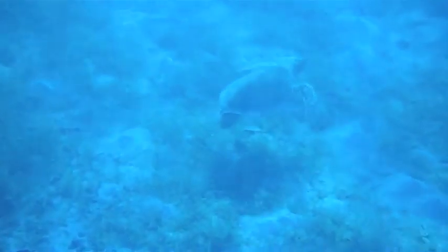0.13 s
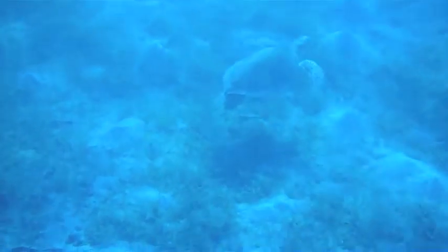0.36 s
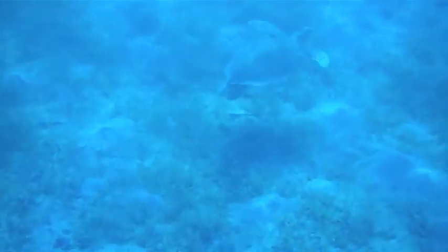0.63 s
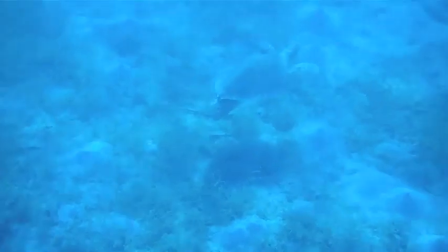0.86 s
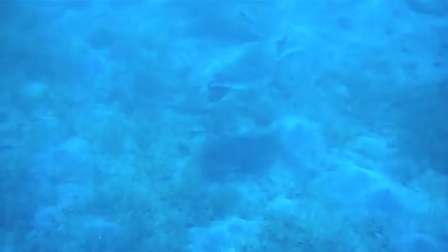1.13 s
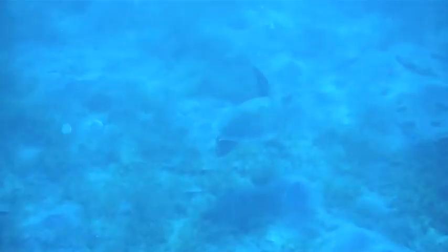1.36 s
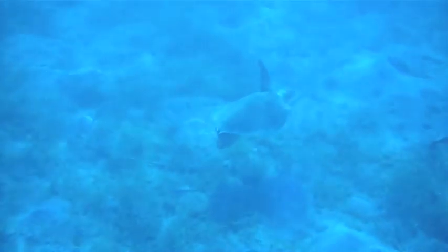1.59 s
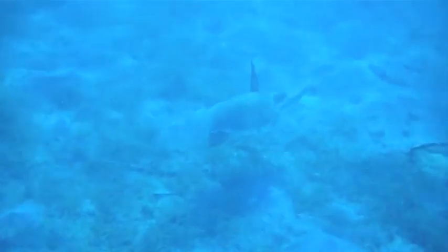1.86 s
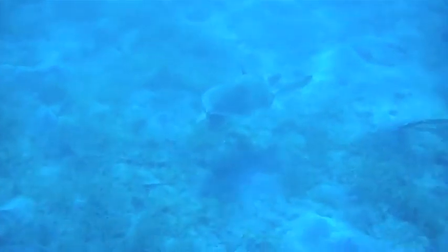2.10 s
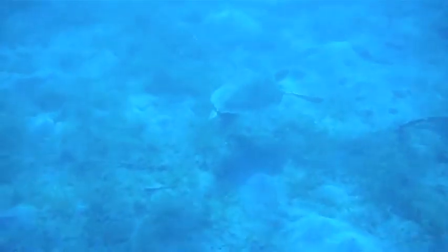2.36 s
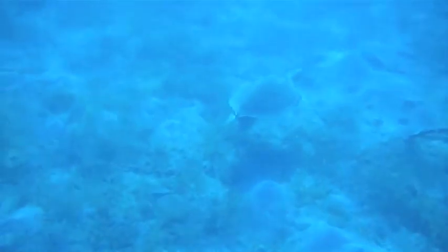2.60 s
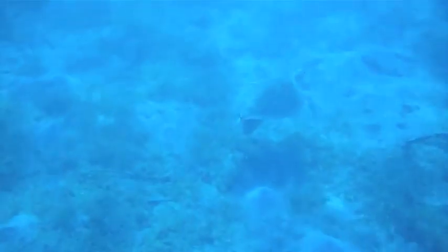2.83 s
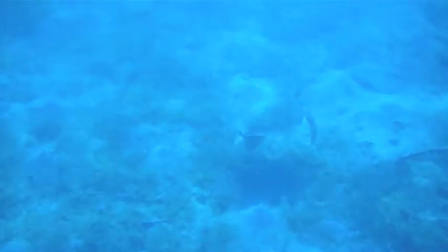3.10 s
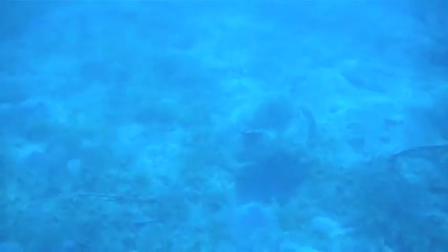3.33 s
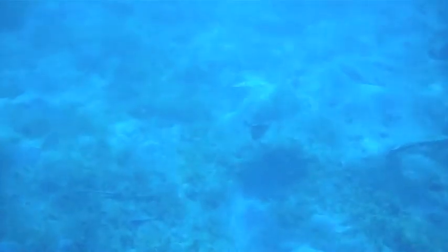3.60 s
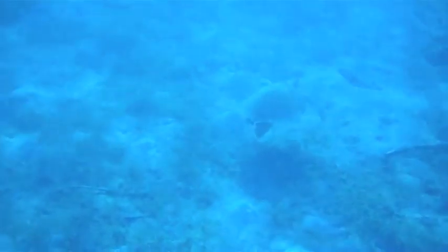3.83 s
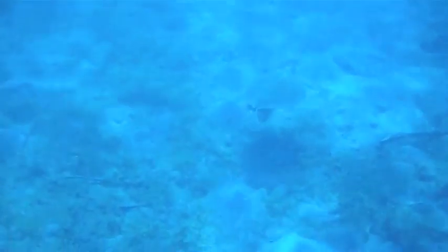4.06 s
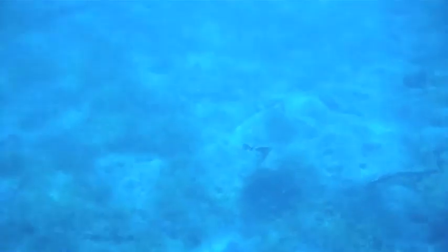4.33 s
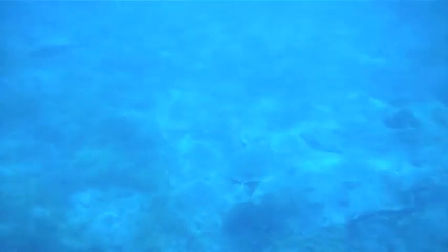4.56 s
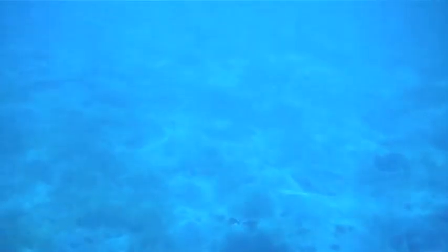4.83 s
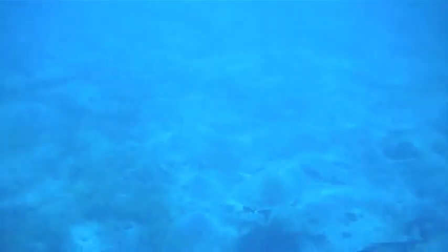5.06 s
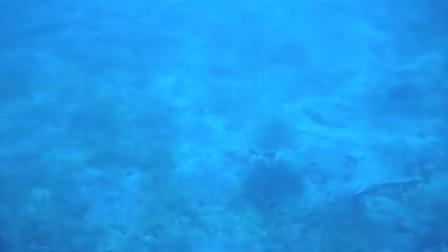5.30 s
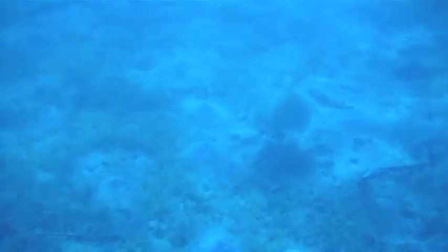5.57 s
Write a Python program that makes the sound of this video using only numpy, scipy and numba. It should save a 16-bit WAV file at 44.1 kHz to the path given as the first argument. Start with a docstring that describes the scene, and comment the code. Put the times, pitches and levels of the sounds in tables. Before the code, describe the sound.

Underwater above a reef where a turtle swims silently, a camera in a hard housing picks up constant fine shrimp crackle, hiss, a faint whine and low water rumble. Hands tap and knock the case, lightly at first, then with sharper clacks; two very loud blows near four seconds overload the microphones. Later a cluster of rubbing and taps follows.

```python
"""Sharp cracks and shrimp crackle sound all round while hands knock, rub and scrape a camera's hard housing
over a reef. Blows, cracks and rubbing are damped modes of the housing, struck or driven by noise; the scrape
is noise in a wall. Below them lie filtered-noise water rumble, soft low thumps, a thin electronic whine,
hiss and a low hum. The hardest blows overload the input, and the gain control ducks after them."""
import sys
import numpy as np
from scipy import signal
from scipy.fft import rfft, irfft
from scipy.io import wavfile
from scipy.ndimage import uniform_filter1d
from numba import njit

SR = 44100
rng = np.random.default_rng(int(sys.argv[2]) if len(sys.argv) > 2 else 0)


def transcribe(signal):
    """Save signal, clipped to [-1, 1], as a 16-bit WAV file at the path in sys.argv[1]."""
    frames = np.atleast_2d(signal).T
    limited = np.clip(frames, -1, 1)
    pcm = np.round(limited * 32767).astype(np.int16)
    wavfile.write(sys.argv[1], SR, pcm)


def makeup_ratio(level_db):
    """Linear amplitude ratio for a level in decibels (20 dB per factor of ten)."""
    decades = np.asarray(level_db, float) / 20
    return 10 ** decades


N = 272538

# big panels sound below the first limit, small panels up to the second, the highest modes above it
BIG_PANEL_TOP_HZ, SMALL_PANEL_TOP_HZ = 600, 2500


def level(x, db):
    """Scale to an rms level."""
    return x * makeup_ratio(db) / np.sqrt(np.mean(x ** 2))


def curves(table):
    """Interpolate the columns of a (time [s], value, ..) table at every sample."""
    times, *columns = np.transpose(table)
    return [np.interp(np.arange(N) / SR, times, column) for column in columns]


def strays(db, hz, spread_db, spread, busy, count):
    """Rows (time [s], level [dB], pitch [Hz]) at random moments, denser where busy is high."""
    share = np.cumsum(busy)
    size, bend = rng.standard_normal((count, 2)).T
    times = np.searchsorted(share, rng.random(count) * share[-1]) / SR
    return list(zip(times, db + spread_db * size, hz * np.exp(spread * bend)))


def ears(vibration, pan_db, lead):
    """A complex vibration as the left and right microphones hear it, apart in level and phase."""
    side = np.array([1., -1.]).reshape(2, *[1] * np.ndim(vibration))
    return np.imag(vibration * makeup_ratio(side * pan_db / 2) * np.exp(-.5j * side * lead))


# ringing modes of the housing: (frequency [Hz], t60 [s], level under steady sound [dB],
# level under a blow [dB], left minus right [dB], right leads by [rad])
HOUSING_MODES = [(101.9, 0.059, -13, 13.5, -8, 7.5), (199, 0.13, -24, -14.5, 0.5, 1),
                 (248, 0.081, -16, -4.5, -1, -1.5), (308.5, 0.054, -2, 2, -2.5, -0.3),
                 (355.6, 0.048, -4, -8.5, -4, 0.5), (540, 0.016, -30.5, -17, 18.5, 1.5),
                 (879.4, 0.019, -7, 1, 2, 1.05), (1080, 0.018, -13.5, -9.5, -4.5, -0.34),
                 (1150, 0.0091, -17.5, -4.5, 1.5, -0.8), (1236, 0.02, -9, -3, -3, 0.5),
                 (1496, 0.015, -18.5, -6.5, -3, 1.08), (1934, 0.12, 5.5, -33, -3, 0.79),
                 (2048, 0.014, -5.5, 4.5, -4, 0.4), (2827, 0.01, 2.5, 10.5, -8, -2),
                 (3465, 0.0077, -35, -2, -11.5, -1.5), (3817, 0.012, -36, -2.5, 21, 0.3),
                 (4370, 0.14, -35.5, -42.5, -12, -0.5), (4548, 0.012, 5.5, 1, -2.5, -2.5),
                 (5403, 0.0092, -7.5, 3, -8, 4), (6115, 0.01, 5.5, -5, 1.5, -1.5),
                 (6410, 0.012, 0.5, -1.5, -25.5, 2.5), (7460, 0.0054, -34, -1.5, 37.5, -0.3),
                 (8820, 0.012, -45, 0, 18.5, 2), (10300, 0.0018, -22.5, 10, 23.5, 0.45),
                 (12900, 0.0028, -44, -1, 19, 5)]


def part(low_hz, high_hz):
    """The housing modes between two frequencies."""
    return [mode for mode in HOUSING_MODES if low_hz <= mode[0] < high_hz]


def ring(rows, modes, rise_s, reach, steep, scatter, scatter_db, detune, lean=0):
    """Each (time [s], peak [dB], pitch [Hz], pan [dB]) blow rings the modes near its pitch as they die away."""
    length = 4096
    out, t = np.zeros((2, N + length)), np.arange(length) / SR
    hz, t60, _, blow_db, pan_db, lead = np.transpose(modes)[:, :, None]
    decay = np.exp(-np.log(1000) / t60 * t)
    fade = decay * (1 - np.exp(-t / rise_s)) ** 2
    # each mode's phase, level and pitch vary a little at random from blow to blow
    chance = rng.standard_normal((len(rows), 3, len(modes), 1))
    for (s, db, centre_hz, side_db), (turn, size, bend) in zip(rows, chance):
        distance = np.log(hz / centre_hz) / reach
        weight = makeup_ratio(blow_db + scatter_db * size) / (1 + distance ** 2) ** steep
        # a positive lean favours the modes below the pitch, as a soft fingertip does
        weight = weight * (centre_hz / hz) ** lean
        bent_hz = hz * (1 + detune * bend)
        swing = fade * np.exp(1j * (2 * np.pi * bent_hz * t + scatter * turn))
        wave = ears(swing * weight, pan_db, lead).sum(axis=1)
        wave = wave * makeup_ratio(np.array([[side_db], [-side_db]]) / 2)
        mean_peak = np.abs(wave).max(axis=1).mean()
        start = int(s * SR)
        out[:, start:start + length] += wave * makeup_ratio(db) / mean_peak
    return out[:, :N]


def through(x, modes):
    """A steady push heard through resonant modes, each a one-pole complex resonator."""
    out = 0
    for hz, t60, steady_db, _, pan_db, lead in modes:
        pole = np.exp((2j * np.pi * hz - np.log(1000) / t60) / SR)
        vibration = signal.lfilter([1 - abs(pole)], [1, -pole], x)
        out = out + ears(vibration * makeup_ratio(steady_db), pan_db, lead)
    # little of the lowest bass comes through the ringing modes
    return signal.sosfilt(signal.butter(2, 140.0, "highpass", fs=SR, output="sos"), out)


# faint finger taps: typical thud and knock
TAP_THUD_DB, TAP_THUD_HZ, TAP_KNOCK_DB, TAP_KNOCK_HZ = -43, 316, -41, 1400
# hands against the case: (time [s], thud peak [dB], thud pitch [Hz], knock peak [dB], knock pitch [Hz])
HAND_KNOCKS = [(0.131, -41, 343, -44.5, 890), (0.3274, -40.5, 363, -19, 1150),
               (0.6068, -37, 362, -28, 1140), (0.8006, -36, 316, -27, 1050), (0.859, -37, 341, -18.5, 1150),
               (0.9194, -35, 328, -38, 1010), (0.9308, -32.5, 298, -29, 1110),
               (0.9609, -20, 240, -22, 1320), (1.0431, -22.5, 243, -21, 1280),
               (1.069, -45, 306, -36.5, 960), (1.1574, -30, 347, -19.5, 920),
               (1.1998, -63, 267, -33.5, 2030), (1.239, -60.5, 320, -35.5, 1030),
               (1.2734, -40.5, 307, -31.5, 1040), (1.3806, -29, 346, -30.5, 1110),
               (1.6545, -41.5, 314, -34, 1910), (1.7054, -38, 360, -42.5, 1040),
               (1.8763, -58, 312, -32, 1960), (2.137, -20, 269.4, -27.5, 1150),
               (2.409, -14.5, 323, -13, 1210), (2.5392, -24, 307, -16, 1640),
               (2.6361, -41, 257, -38.5, 2020), (2.9527, -22.5, 279, -14.5, 1640),
               (3.0082, -51, 275, -26, 1860), (3.05, -30.5, 250, -35.5, 1250), (3.683, -23, 269, -45, 1100),
               (3.7557, -16.5, 270, -15.5, 1550), (3.9167, 3, 248, -4.5, 1636),
               (4.0307, -33.5, 269, -64, 1690), (4.2793, -23.5, 268, -30, 1150), (4.313, -20, 248, 7, 964),
               (4.315, 5.5, 248, -1, 1530), (4.37, -26.5, 315, -31.5, 1260), (4.72, -39.5, 360, -46, 1300),
               (4.9756, -36.5, 277, -44, 1020), (5.2031, -33.5, 340, -31.5, 1090),
               (5.4996, -55, 356, -32.5, 1120), (5.548, -40, 332, -15.5, 1310),
               (5.5561, -24.5, 338, -25.5, 1040), (5.575, -30.5, 307, -35, 1120),
               (5.805, -31, 229, -48, 1250), (5.8242, -6.5, 272, -10, 1016), (5.8384, -21, 278, -43, 1350),
               (5.8568, -38, 373, -16, 1436), (5.8652, -32, 330, -20.5, 1080),
               (5.914, -26.5, 270, -28.5, 1110), (5.932, -30, 340, -42, 1200),
               (5.944, -29.5, 334, -29, 1050), (5.954, -28.5, 343, -26, 1590),
               (5.9696, -30, 354, -28, 1080), (6.0133, -29.5, 346, -27.5, 1510),
               (6.0328, -29, 256, -55, 1520), (6.065, -18.5, 348, -31, 1510), (6.077, -25, 258, -33, 1060),
               (6.123, -33, 363, -16.5, 1070), (6.1263, -49, 360, -18, 1160),
               (6.1482, -58, 320, -39.5, 2030)]


def knocks():
    """Hands thud the slow big panels and knock the quicker small ones; faint taps join in at random."""
    # more taps fall when the hands drag hard
    drag_power = makeup_ratio(curves(DRAG)[0]) ** 2
    taps = strays(TAP_THUD_DB, TAP_THUD_HZ, spread_db=2.5, spread=0.054, busy=drag_power, count=20)
    thuds = [(s, db, hz, 0) for s, db, hz, _, _ in HAND_KNOCKS]
    thuds += [(*tap, 0) for tap in taps]
    raps = [(s, db, hz, 0) for s, _, _, db, hz in HAND_KNOCKS]
    raps += [(s, db - TAP_THUD_DB + TAP_KNOCK_DB, hz / TAP_THUD_HZ * TAP_KNOCK_HZ, 0) for s, db, hz in taps]
    # a stiff rib is carried along by the big panels and sings on faintly after them
    rib = [(s, db - 35.5, 1945, 0) for s, db, _, _ in thuds]
    rib_ring = ring(rib, part(1850, 2040), rise_s=0.0015, reach=.5, steep=1, scatter=0.67,
                    scatter_db=1, detune=0)
    big_panels = ring(thuds, part(0, BIG_PANEL_TOP_HZ), rise_s=0.00065, reach=0.083, steep=1.1,
                      scatter=0.18, scatter_db=3.0, detune=0.0018)
    small_panels = ring(raps, part(BIG_PANEL_TOP_HZ, SMALL_PANEL_TOP_HZ), rise_s=0.00037, reach=0.2,
                        steep=0.99, scatter=1.0, scatter_db=3.0, detune=0.021, lean=.6)
    return rib_ring + big_panels + small_panels


# typical snap from a little further off
FAR_SNAP_DB, FAR_SNAP_HZ, FAR_SNAP_PAN_DB = -41, 5500, -6
# sharp high cracks, from near snaps, case ticks and the bright edge of hard hand knocks:
# (time [s], peak [dB], centre pitch [Hz], left minus right [dB])
SHARP_CRACKS = [(0.2819, -28, 5340, -3), (0.291, -23, 5270, 5), (0.3314, -32, 5270, -2.5),
                (0.3999, -26, 5570, -1), (0.5132, -29.5, 5560, -5), (0.6388, -28.5, 5600, 0),
                (0.9611, -13, 3860, -4.5), (1.0432, -19, 4020, -4), (1.0559, -27, 5350, 0),
                (1.2007, -25, 4470, -3), (1.7535, -22.5, 5130, -2), (1.8527, -26.5, 6500, -2),
                (1.8755, -26, 4800, 1), (1.9417, -29.5, 4850, -1), (1.9769, -33, 5530, -7),
                (2.0135, -28, 5760, 1), (2.2307, -24.5, 5500, -5.5), (2.4096, -30.5, 4900, -12),
                (2.5069, -31.5, 6330, -5), (2.5395, -7, 5060, -3), (2.6271, -31, 3840, -13),
                (2.9407, -28, 5080, 1), (2.9529, -5, 4850, 0), (3.0088, -22, 5160, 2),
                (3.0509, -36, 5040, 1.5), (3.372, -27, 6560, 4), (3.5237, -30, 4800, 3),
                (3.7154, -30.5, 5900, 3), (3.7555, -1.5, 5600, -1), (3.9171, 8.5, 5160, -5.5),
                (3.9522, -26, 5600, 1), (4.3134, -1.5, 5160, 3), (4.5493, -30.5, 5730, -2),
                (4.8447, -32, 5800, 2.5), (5.002, -20, 5950, -0.5), (5.242, -22.5, 5460, 2),
                (5.2649, -30, 6130, -7), (5.3235, -32, 3250, -14), (5.3847, -20, 6580, -1.5),
                (5.549, -33.5, 3570, -3), (5.7528, -23, 7000, -1), (5.7811, -23, 6300, -3.5),
                (5.8245, -23, 4900, -25), (5.8365, -26, 5450, -3), (5.8898, -28, 5800, -1),
                (5.9352, -17, 8200, 1.5)]


def cracks():
    """Near snaps, case ticks and the edge of hard knocks ring the highest modes; far snaps fall at random."""
    far = strays(FAR_SNAP_DB, FAR_SNAP_HZ, spread_db=3.0, spread=0.083, busy=np.ones(N), count=16)
    far = [(*row, FAR_SNAP_PAN_DB) for row in far]
    # here the modes keep less than half their left-right lean, and each crack adds its own
    modes = [(hz, t60, steady_db, blow_db, 0.43 * pan_db, lead)
             for hz, t60, steady_db, blow_db, pan_db, lead in part(SMALL_PANEL_TOP_HZ, SR)]
    return ring(SHARP_CRACKS + far, modes, rise_s=0.000078, reach=0.28, steep=1.04, scatter=2.5,
                scatter_db=2.0, detune=0.039)


def crackle():
    """Thousands of distant snaps a second ring the housing, a few far stronger than the rest."""
    hit, size, sign = rng.random(N), rng.exponential(size=N), rng.standard_normal(N)
    snaps_per_s = 2500
    clicks = (hit < snaps_per_s / SR) * makeup_ratio(np.minimum(3.2 * size, 17)) * sign
    bright = level(through(clicks, part(SMALL_PANEL_TOP_HZ, SR)), -54.5)
    low = level(through(clicks, part(0, SMALL_PANEL_TOP_HZ)), -63.5)
    return bright + low


# small panels have this level at a usual drag and follow a share of its changes in dB
USUAL_DRAG_DB, SMALL_DB, SMALL_SHARE = -53, -57, 0.62
# how hard hands and water drag over the case: (time [s], level on the big panels [dB])
DRAG = [(0.0, -53), (0.55, -51.5), (0.96, -49.5), (1.4, -53.5), (2.58, -53.5), (3.7, -52.5), (4.0, -57),
        (4.32, -52), (4.8, -58), (5.16, -53), (5.35, -57), (5.73, -45.5), (5.92, -46), (6.18, -54)]


def rub():
    """Hands and water drag over the case: grainy noise keeps its lower modes sounding."""
    grain = makeup_ratio(1.85 * level(uniform_filter1d(rng.standard_normal(N), size=900), 0))
    push = grain * rng.standard_normal(N)
    drag_db = curves(DRAG)[0]
    small_db = SMALL_DB + SMALL_SHARE * (drag_db - USUAL_DRAG_DB)
    big_panels = level(through(push, part(0, BIG_PANEL_TOP_HZ)), 0)
    small_panels = level(through(push, part(BIG_PANEL_TOP_HZ, SMALL_PANEL_TOP_HZ)), 0)
    return big_panels * makeup_ratio(drag_db) + small_panels * makeup_ratio(small_db)


# one slide: it swells until the start time, holds, then eases off
SLIDE_S, SLIDE_DB, HOLD_S, PRESS_DB_PER_S, EASE_DB_PER_S = 5.62, -48, 0.081, 200, 142
# modes of the wall under the sliding skin: (frequency [Hz], level [dB])
WALL_MODES = [(856, 3), (1260, 4), (1945, 1), (2160, -4)]


def scrape():
    """Skin sliding on plastic: dense slips, as noise, sound the modes of the wall."""
    t = np.arange(N) / SR - SLIDE_S
    swell_db, ease_db = PRESS_DB_PER_S * t, EASE_DB_PER_S * (HOLD_S - t)
    press_db = SLIDE_DB + np.minimum(0, np.minimum(swell_db, ease_db))
    wall = [(hz, .045, db, 0, -2.5, .2) for hz, db in WALL_MODES]
    return level(through(rng.standard_normal(N), wall), 0) * makeup_ratio(press_db)


# water moving past: (time [s], level [dB])
WATER_FLOW = [(0.0, -62), (0.8, -58.5), (1.0, -44.5), (2.46, -49.5), (2.87, -41.5), (3.08, -48.5),
              (3.39, -45), (4.28, -44.5), (4.97, -57.5), (5.61, -54), (5.83, -48.5), (6.18, -48)]


def flow():
    """Slow uneven pressure of water moving past, as low noise partly shared by both sides; stronger right."""
    surge = makeup_ratio(4.0 * level(uniform_filter1d(rng.standard_normal(N), size=2500), 0))
    band = signal.butter(1, [6.0, 20.0], "bandpass", fs=SR, output="sos")
    rumble = signal.sosfilt(band, surge * rng.standard_normal((2, N)))
    common, apart = signal.sosfilt(signal.butter(2, 60.0, fs=SR, output="sos"), rumble)
    pair = makeup_ratio(np.array([[-2.5], [2.5]])) * common + 0.376 * np.array([[1], [-1]]) * apart
    return level(pair, 0) * makeup_ratio(curves(WATER_FLOW)[0])


# soft low thumps, from water pressure and from hands knocking the case:
# (time [s], peak before panning [dB], frequency [Hz])
LOW_THUMPS = [(0.839, -42, 37), (1.06, -40.5, 11.8), (1.929, -40.5, 15.6), (2.385, -46, 69),
              (2.61, -42, 31), (2.751, -39, 56), (3.5, -45, 66), (5.8, -35.5, 144), (5.821, -30, 100),
              (6.031, -30.5, 108), (6.062, -30.5, 66), (6.078, -38, 48)]


def thumps():
    """Each soft low thump is one quickly damped swing of pressure, stronger on the right."""
    length = 8192
    out, t = np.zeros(N + length), np.arange(length) / SR
    for s, db, hz in LOW_THUMPS:
        swing = np.sin(2 * np.pi * hz * t) * hz * t * np.exp(-1.6 * hz * t)
        start = int(s * SR)
        out[start:start + length] += swing * makeup_ratio(db) / np.abs(swing).max()
    return makeup_ratio(np.array([[-2.2], [2.2]])) * out[:N]


# half the line rate of the picture, and its frame rate
WHINE_HZ, FRAME_HZ = 7867.1, 29.97


def whine():
    """The electronics' thin tone, turned over in polarity at every picture frame; nearer the left."""
    t = np.arange(N) / SR
    turn = np.tanh(18.0 * np.sin(np.pi * FRAME_HZ * t))
    return ears(makeup_ratio(-63) * turn * np.exp(2j * np.pi * WHINE_HZ * t), 9, -.6)


# spectrum of the microphone hiss: (frequency [Hz], relative level per Hz [dB])
HISS_SPECTRUM = [(30, -17), (300, -5), (1500, -5.5), (5000, 1), (8000, -2.5), (9500, -12.5), (13500, -13.5),
                 (14800, -11), (17000, -48)]


def hiss():
    """Unrelated noise of the two microphone capsules, shaped in the spectrum."""
    hz, db = np.transpose(HISS_SPECTRUM)
    bins_hz = np.fft.rfftfreq(N, 1 / SR)
    shape = makeup_ratio(np.interp(np.log(bins_hz + 1), np.log(hz), db))
    return level(irfft(rfft(rng.standard_normal((2, N))) * shape, N), -54)


HUM_HZ, HUM_T60_S, HUM_DB = 194.3, 0.46, -66


def hum():
    """A low hum that wavers in level: noise in one narrow resonance."""
    return level(through(rng.standard_normal(N), [(HUM_HZ, HUM_T60_S, 0, 0, -3, .1)]), HUM_DB)


def scene():
    """All the sources together at the two microphones."""
    return knocks() + cracks() + crackle() + rub() + scrape() + flow() + thumps() + whine() + hiss() + hum()


@njit
def follow(x, attack, release):
    """Envelope that rises fast and falls slowly."""
    out, e = np.empty(len(x)), 0.
    for i in range(len(x)):
        e += (x[i] - e) * (attack if x[i] > e else release)
        out[i] = e
    return out


def top_cut(x):
    """Nothing passes above the cut-off."""
    return signal.sosfilt(signal.butter(12, 16810, fs=SR, output="sos"), x)


def record(dry, rail=0.94):
    """The input clips, the gain control drops after loud blows and creeps back, and the top is cut."""
    clipped = rail * np.tanh((np.abs(dry) / rail) ** 3) ** (1 / 3) * np.sign(dry)
    # driven far past the upper rail the left input jumps to the lower one
    clipped[0] = np.where(dry[0] > 1.15, -clipped[0], clipped[0])
    attack_s, release_s = .02, .09
    envelope = follow(np.abs(dry).max(axis=0), 1 / (attack_s * SR), 1 / (release_s * SR))
    # the gain control answers 12 ms late
    envelope = np.pad(envelope, (530, 0))[:N]
    # above -16 dB it takes back half of the excess in dB
    gain = np.maximum(envelope / makeup_ratio(-16), 1) ** -.5
    gentle_cut = signal.ellip(5, .5, 22, 14200, fs=SR, output="sos")
    steep_cut = signal.ellip(8, .5, 60, 16400, fs=SR, output="sos")
    dull = signal.sosfilt(np.vstack([gentle_cut, steep_cut]), clipped * gain)
    return top_cut(dull)


dry = scene()
out = record(dry)
transcribe(out)
```